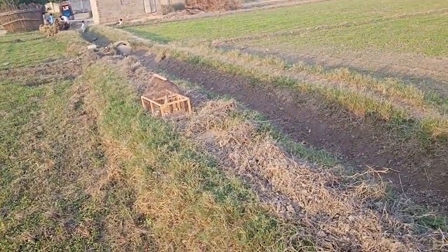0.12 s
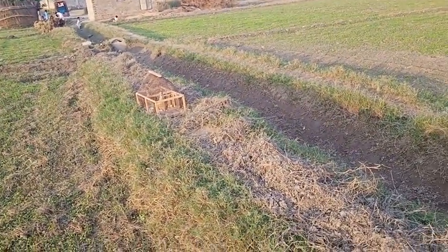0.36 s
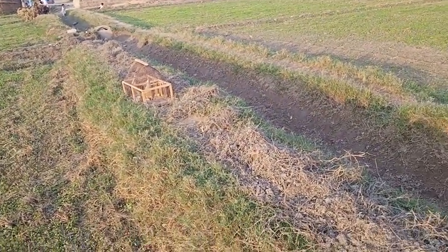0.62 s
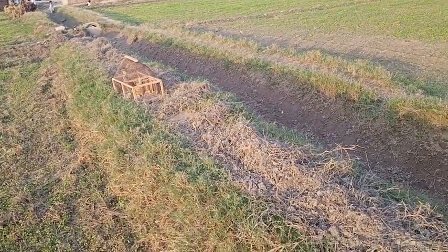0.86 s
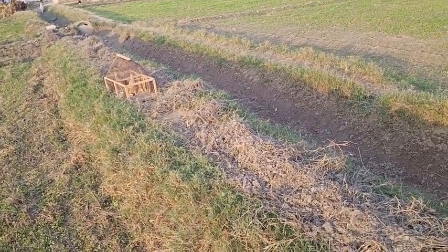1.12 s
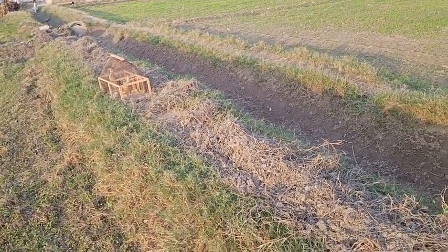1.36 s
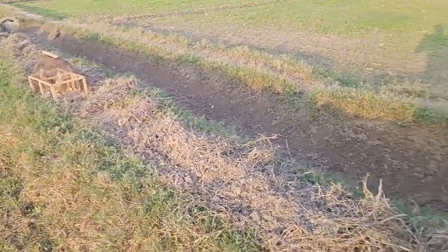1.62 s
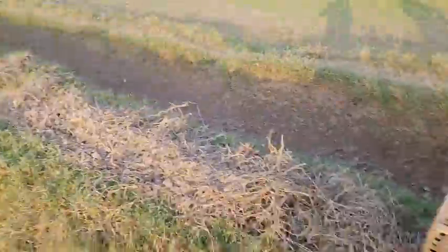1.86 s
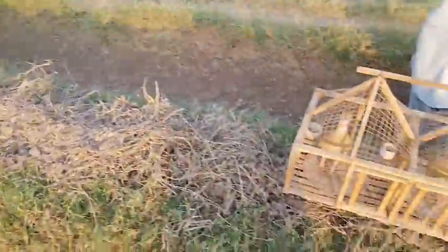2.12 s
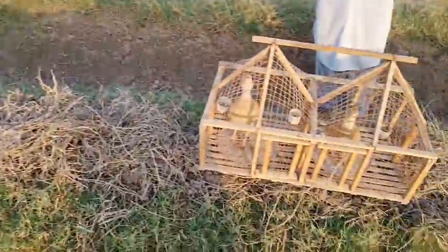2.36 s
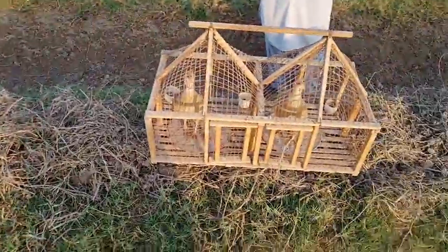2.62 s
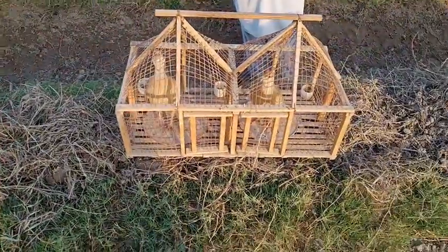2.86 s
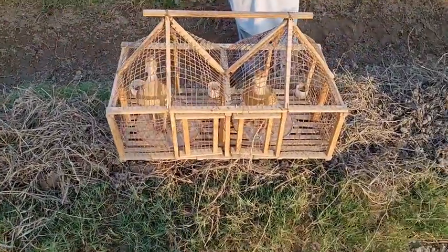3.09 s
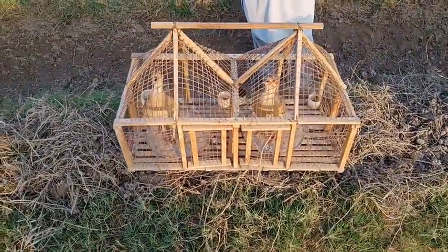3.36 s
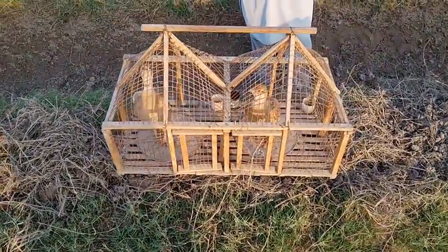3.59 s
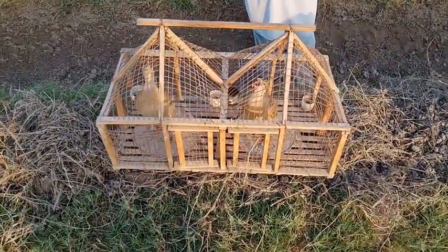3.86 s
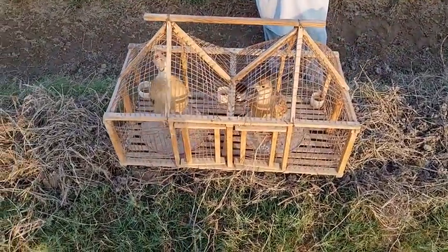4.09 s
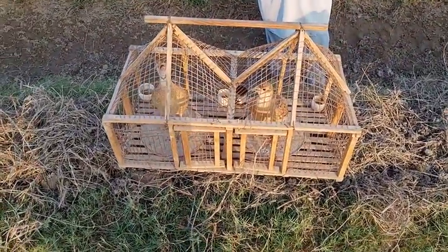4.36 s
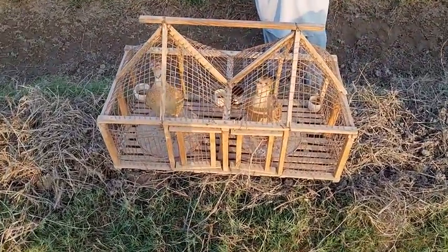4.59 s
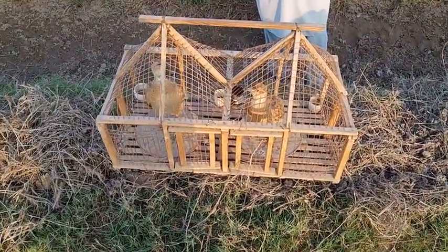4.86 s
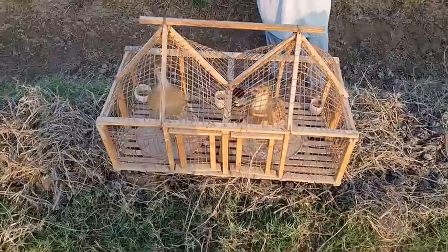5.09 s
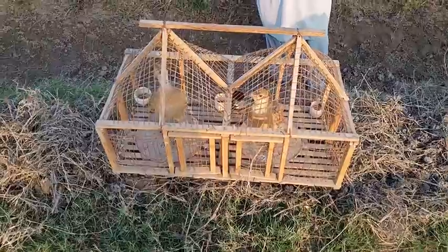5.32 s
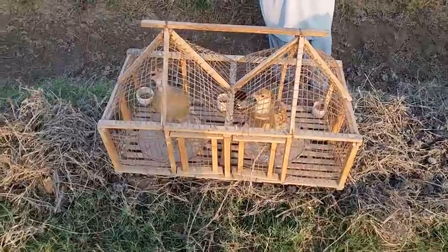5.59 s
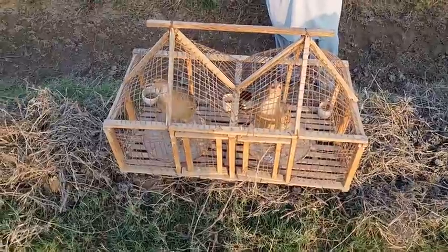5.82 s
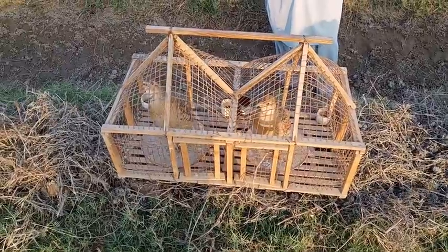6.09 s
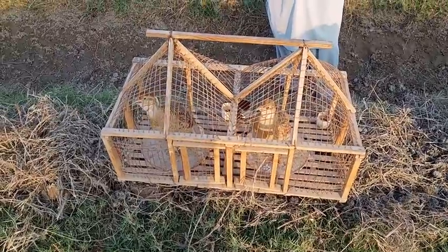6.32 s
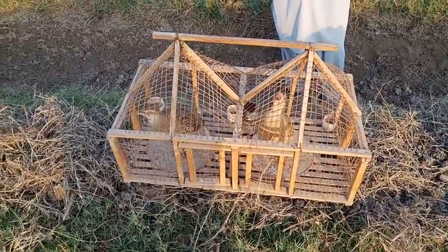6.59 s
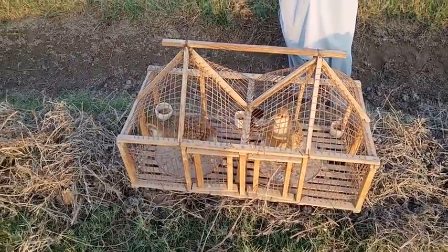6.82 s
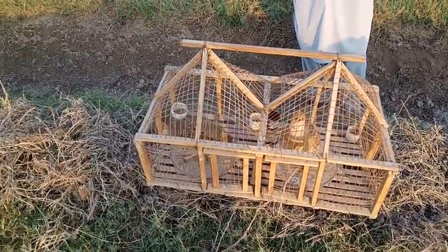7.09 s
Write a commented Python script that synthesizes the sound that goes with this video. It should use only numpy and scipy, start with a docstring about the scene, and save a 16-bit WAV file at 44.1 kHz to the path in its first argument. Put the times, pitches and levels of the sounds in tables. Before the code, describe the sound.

After a faint straw rustle and distant soft piping, a caged ground bird close to a phone microphone bursts into loud, rhythmic calling: a rasp, a piercing steady whistle, a shorter note slurring downward, then clucks, about every 0.6 seconds. Lower and higher neighbours overlap it. Open farmland adds only a low hush and weak echo. The calling stops near the end, leaving quiet air and very faint far birds.

```python
"""Open farmland, where several caged ground birds call together close to a phone.
Whistles are gliding tones with overtones; harsh rasps are irregular throat pulses ringing three cavities.
Far birds pipe faintly with the same kind of tone. Filtered noise makes a low field hush, and
grains of noise a brief rustle of straw at the start. The ground and distant walls send back a weak echo."""
import sys
import numpy as np
from scipy import signal
from scipy.fft import rfft, irfft, next_fast_len
from scipy.io import wavfile
from scipy.ndimage import map_coordinates

SR = 44100
rng = np.random.default_rng(int(sys.argv[2]) if len(sys.argv) > 2 else 0)


def convert_level_to_amplitude(level_db):
    """Map a level in decibels to its linear amplitude factor."""
    exponent = np.asarray(level_db, float) / 20
    return 10 ** exponent


def dump(signal):
    """Clip the signal to [-1, 1] and save it as 16-bit WAV at the path in sys.argv[1]."""
    limited = np.clip(np.atleast_2d(signal).T, -1, 1)
    pcm = np.round(limited * 32767).astype(np.int16)
    wavfile.write(sys.argv[1], SR, pcm)


N = 317590  # length of the scene in samples

# In the note tables, levels are set before the slow fade, flutter and chest lift; overtones before dulling.
# the near bird's long notes: (start t/s, length t/s, pitch f/Hz, level/dB, 3rd overtone level/dB)
LONG_NOTES = [(.361, .084, 2387, -11.5, -6.5), (.922, .08, 2444, -12, -5.5), (1.479, 0.086, 2447, -12, -6),
              (2.062, 0.084, 2443, -12, -13), (2.678, .087, 2450, -15.5, -8),
              (3.299, .084, 2437, -18, -5.5), (3.906, .084, 2444, -12, -10.5),
              (4.523, .092, 2434, -11, -12), (5.2, .086, 2434, -11.5, -14),
              (5.836, 0.092, 2425, -11, -10.5), (6.56, .089, 2423, -13, -6.5)]
# its short notes: (start t/s, length t/s, pitch f/Hz, level/dB, 3rd overtone level/dB)
SHORT_NOTES = [(1.063, .027, 2270, -13.5, -9), (1.677, .031, 2274, -12, -11), (2.29, 0.033, 2282, -14, -9),
               (2.869, 0.032, 2262, -11, -19), (3.476, .035, 2274, -11, -18),
               (4.091, .033, 2292, -10, -18.5), (4.782, .038, 2282, -13.5, -14.5),
               (5.402, 0.035, 2266, -15.5, -7), (6, .032, 2300, -20, -1.5)]
# its falling slurs after short notes: (start t/s, length t/s, start f/Hz, end f/Hz, level/dB)
FALLING_SLURS = [(1.117, 0.06, 2383, 1582, -15), (1.735, .064, 2330, 1576, -13),
                 (2.352, 0.059, 2380, 1528, -14), (2.931, .056, 2382, 1595, -15.5),
                 (3.538, .055, 2392, 1584, -13), (4.153, 0.055, 2343, 1581, -12),
                 (4.847, .051, 2368, 1597, -14.5), (5.469, 0.047, 2368, 1618, -13),
                 (6.065, .046, 2323, 1620, -13.5)]
# its clucks, a cough that breaks into a quick drop:
# (start t/s, length t/s, start f/Hz, level/dB, cough level/dB)
COUGHED_CLUCKS = [(1.31, 0.028, 2300, -12, -19), (1.435, .027, 2002, -17.5, -20.5),
                  (1.914, .03, 2230, -14, -20.5), (2.534, .03, 2196, -15, -21),
                  (3.112, 0.031, 2250, -18, -20.5), (3.238, .029, 2026, -16, -24),
                  (4.335, .029, 2095, -15.5, -23.5), (5.013, .029, 1978, -19, -25),
                  (5.638, 0.028, 1969, -19, -24.5), (6.236, 0.031, 1940, -22.5, -22)]


def unit(x):
    """Scales a sound to rms 1."""
    return x / np.sqrt(np.mean(x ** 2) + 1e-20)


def along(points, hz):
    """Reads (f/Hz, value) points on a log frequency axis."""
    f, v = np.transpose(points)
    return np.interp(np.log(hz + 1), np.log(f + 1), v)


def curve(rows):
    """Turns (t/s, value) rows into one value per sample."""
    return np.interp(np.arange(N) / SR, *np.transpose(rows))


def wobble(rate, size):
    """A smooth random curve with rate knots a second."""
    knots = rng.standard_normal(int(size * rate / SR) + 4)
    return map_coordinates(knots, [np.arange(size) * rate / SR])


def filtered(x, response):
    """Multiplies the spectrum of x by a complex response of frequency."""
    m = next_fast_len(N + SR // 2)
    return irfft(rfft(x, m) * response(np.fft.rfftfreq(m, 1 / SR)), m)[:N]


def resonances(modes):
    """Causal response of a few (centre f/Hz, width f/Hz, level/dB) resonances, alternating in sign."""
    def response(f):
        total = 0
        for k, (centre, width, db) in enumerate(modes):
            ring = 1j * f * width / (centre * centre - f * f + 1j * f * width)
            total = total + (-1) ** k * convert_level_to_amplitude(db) * ring
        return total
    return response


def add(track, s, sound):
    """Mixes a sound into the track from time s."""
    part = track[max(round(s * SR), 0):][:len(sound)]
    part += sound[:len(part)]


def field():
    """Low hush of air and distant land: coloured noise, gently uneven."""
    # how loud the hush is: (t/s, level/dB)
    hush_level = [(0.0, -52.5), (0.28, -56), (2.85, -62.5), (6.19, -60), (7.2, -67.5)]
    # its colour: (f/Hz, level/dB)
    hush_colour = [(18, -48.5), (40, -27), (60, -18.5), (80, -1.5), (130, -5.5), (250, -8), (500, -14.5),
                   (1200, -8.5), (2500, -16.5), (4500, -22.5), (9000, -31), (16000, -59.5)]
    hush = unit(filtered(rng.standard_normal(N), lambda hz: convert_level_to_amplitude(along(hush_colour, hz))))
    uneven_db = 1.5 * wobble(6, N) + 1.2 * wobble(25, N)
    return convert_level_to_amplitude(curve(hush_level) + uneven_db) * hush


def straw():
    """Dry stalks crackle in small grains: noise of quickly varying strength through two broad resonances."""
    # rustle at the start: (t/s, level/dB)
    rustle_level = [(0, -56), (0.03, -49), (0.07, -56), (0.17, -66), (0.3, -122), (0.34, -110), (7.3, -110)]
    grains = rng.standard_normal(N) * convert_level_to_amplitude(3 * wobble(150, N))
    stalks = resonances([(1500, 5400, 8.0), (3500, 4500, 6.6)])
    return convert_level_to_amplitude(curve(rustle_level)) * unit(filtered(grains, stalks))


def far_birds():
    """Faint far piping: soft-edged gliding tones."""
    # (start t/s, length t/s, start f/Hz, end f/Hz, level/dB)
    piping = [(.018, .015, 1002, 887, -47.5), (.04, .105, 1150, 966, -46.5), (.775, .09, 2450, 2414, -53.5),
              (6.73, 0.061, 1140, 1180, -68), (6.96, .07, 1208, 1414, -66), (6.94, .2, 1160, 1238, -67),
              (6.99, 0.13, 1770, 1874, -68), (6.99, 0.13, 2420, 2450, -66.5), (7.15, .06, 2400, 2340, -63)]
    # shape: (share of the glide left at the middle, 2nd overtone level/dB, 3rd overtone level/dB)
    piping_shape = (0.26, -15.5, -24)
    return whistles(falling(piping, piping_shape), edge_s=0.04, fade_db=2.0, waver_hz=8.5,
                    breath_db=-44.0, dull_db=10, soften=0.1)


def echo(x, decay, delay_s):
    """A noisy tail in which each frequency dies at its own speed; decay: (f/Hz, time to fall 60 dB t/s)."""
    hz, t, z = signal.stft(rng.standard_normal(SR), SR, nperseg=256)
    fading = convert_level_to_amplitude(-60 * t / along(decay, hz)[:, None])
    tail = signal.istft(z * fading, SR, nperseg=256)[1]
    delayed = np.pad(x, (round(delay_s * SR), 0))
    return signal.fftconvolve(delayed, tail / np.linalg.norm(tail))[:N]


def echoes(birds):
    """A weak late answer from the land and a short ring of cage and ground."""
    # decay of the late answer: (f/Hz, time to fall 60 dB t/s)
    land_decay = [(2400, 0.6), (5000, 0.28), (12000, 0.04)]
    answer = convert_level_to_amplitude(-44) * echo(birds, land_decay, delay_s=.03)
    return answer + convert_level_to_amplitude(-18.5) * echo(birds, [(2000, 0.082)], delay_s=0.0027)


def facing(s):
    """Brightness in dB at time s: how squarely the near bird faces the phone."""
    # (t/s, level/dB)
    turning = [(.3, -0.5), (1.1, 4), (1.7, 2.5), (2.4, 1), (3, -1.5), (3.7, -2), (4.4, -1.5), (5, -1),
               (5.7, -1.5), (6.05, 2), (6.2, -2), (6.7, 1)]
    return np.interp(s, *np.transpose(turning))


def held(table, shape, second):
    """Held notes: the pitch bends from start to end, and the 2nd overtone follows up to three other levels.

    Rows out: (start, length, start, middle and end Hz, dB, 2nd dB, 3rd dB, how early it settles)."""
    start, end, settle = shape
    rows = []
    for s, length, hz, db, third_db in table:
        second_db = np.dot(second, [1, third_db, facing(s), db])
        rows.append((s, length, hz * (1 + start / 100), hz, hz * (1 + end / 100), db,
                     second_db, third_db, settle))
    return rows


def falling(table, shape, bright=lambda s: 0):
    """Gliding notes in the same form; bright lifts both overtones."""
    left, second_db, third_db = shape
    rows = []
    for s, length, hz0, hz2, db in table:
        middle = hz2 + left * (hz0 - hz2)
        rows.append((s, length, hz0, middle, hz2, db, second_db + bright(s), third_db + bright(s), 0))
    return rows


def neighbour_notes():
    """The neighbours' held and falling notes; facing also sways the 2nd overtone of the held ones."""
    # held notes of a lower and a higher neighbour, and long notes of a neighbour:
    # (start t/s, length t/s, pitch f/Hz, level/dB, 3rd overtone level/dB)
    low = [(.509, 0.019, 2148, -18, 0.5), (.659, 0.041, 2080, -21.5, -18), (1.213, 0.038, 2108, -20.5, -14),
           (2.28, 0.037, 2114, -30, -12), (2.872, 0.036, 2127, -21, -40), (3.485, .05, 2127, -22, -21),
           (4.731, 0.044, 2132, -16.5, -20.5)]
    high = [(1.1, 0.059, 3127, -22.5, -21), (1.617, .039, 3145, -21, -23.5),
            (1.722, 0.025, 2800, -25, -15.5), (2.105, .068, 3100, -22, -36.5), (2.697, .073, 3146, -27, -8),
            (3.302, 0.037, 3100, -26, -26.5), (3.916, 0.05, 3100, -29, -20.5)]
    answers = [(.575, 0.073, 2436, -24.5, -9), (4.56, .082, 2462, -19.5, -26.5)]
    # falling notes: (start t/s, length t/s, start f/Hz, end f/Hz, level/dB)
    drops = [(.555, .053, 2108, 1528, -21), (.71, .055, 2237, 1408, -16), (1.268, .068, 2132, 1443, -22),
             (1.47, .024, 1746, 1296, -26.5), (1.584, .02, 1920, 1340, -25),
             (1.815, .02, 1716, 1510, -29.5), (1.975, .028, 2041, 1498, -22.5),
             (2.09, .025, 1820, 1450, -32), (2.34, .061, 2162, 1481, -17), (2.663, .012, 1972, 1540, -15),
             (2.94, .037, 2740, 2415, -36), (2.955, .036, 2070, 1606, -20.5),
             (3.131, 0.018, 2014, 1503, -17), (3.56, .048, 2000, 1552, -22),
             (3.755, 0.019, 2063, 1508, -23), (3.875, .01, 1743, 1493, -21.5),
             (4.16, .047, 2207, 1550, -16.5), (4.207, .051, 2267, 1543, -19),
             (4.395, .027, 1973, 1520, -27.5), (4.785, .054, 2222, 1540, -18.5),
             (4.986, 0.029, 1858, 1472, -29)]
    # held shapes: (start over pitch/%, end over pitch/%, how early it settles 0-1)
    low_shape = (1.7, -0.7, 0)
    high_shape = (1.2, -3.3, 0)
    answer_shape = (3.7, -.8, 0.27)
    # 2nd overtone: (level/dB, then the shares it follows of the 3rd overtone, facing and note level)
    low_second = (-6.5, 0.24, 1, 0)
    high_second = (-10.5, 0.5, 1.6, 0)
    answer_second = (-10, 1, -0.5, -0.5)
    # falling shape: (share of the drop left at the middle, 2nd overtone level/dB, 3rd overtone level/dB)
    drop_shape = (.48, -20.5, -26.5)
    rows = held(low, low_shape, low_second) + held(high, high_shape, high_second)
    rows += held(answers, answer_shape, answer_second)
    return rows + falling(drops, drop_shape)


def near_notes():
    """Every whistled note of the near bird, held or falling."""
    # brief clear pips inside the rasp before a long note, and mellow clucks, which only sag:
    # (start t/s, length t/s, pitch f/Hz, level/dB, 3rd overtone level/dB)
    pips = [(.88, .018, 2470, -17, 1.5), (1.44, .019, 2462, -20, 1), (2.021, .017, 2485, -19, -4),
            (3.26, .016, 2480, -23, -3), (3.869, .015, 2420, -26, -9), (4.49, .0084, 2414, -22, -2),
            (5.164, .012, 2440, -27, 2), (5.806, .008, 2440, -27, 2.5), (6.528, 0.0072, 2406, -27, 3)]
    mellow = [(3.713, 0.034, 1915, -18.5, -18.5), (3.843, .031, 1894, -18.5, -21)]
    # held shapes: (start over pitch/%, end over pitch/%, how early it settles 0-1)
    long_shape = (2.5, -.1, 0.15)
    pip_shape = (-5, -.5, 0)
    short_shape = (1.18, -0.84, 0)
    mellow_shape = (5.3, -11, 0)
    # 2nd overtone: (level/dB, then the shares it follows of the 3rd overtone, facing and note level)
    long_second = (-27.5, 0, .3, -1.34)
    pip_second = (-2, -1, 0.7, 0)
    short_second = (-13.5, 0, 2, 0)
    mellow_second = (-11, 0, 0.5, 0)
    # falling shapes: (share of the drop left at the middle, 2nd overtone level/dB, 3rd overtone level/dB)
    slur_shape = (.52, -20.5, -18)
    cluck_shape = (.42, -18.5, -20.5)
    cluck_end_hz = 1526
    clucks = [(s, length, hz, cluck_end_hz, db) for s, length, hz, db, _ in COUGHED_CLUCKS]
    rows = held(LONG_NOTES, long_shape, long_second) + held(pips, pip_shape, pip_second)
    rows += held(SHORT_NOTES, short_shape, short_second) + held(mellow, mellow_shape, mellow_second)
    return rows + falling(FALLING_SLURS, slur_shape, facing) + falling(clucks, cluck_shape, facing)


def breaks():
    """The voice breaks into a rasp at the edges of notes and at other set times.

    Rows out: (start, rise, fall, dB, chest dB, beak dB), the last two against the throat."""
    # lone rasps, lead-ins to long notes, coughs with or without a cluck after,
    # and faint low noise beside whistles:
    # (start t/s, rise t/s, fall t/s, peak level/dB, chest level/dB)
    timed_rasps = [(.307, 0.016, 0.042, -19.5, -8), (.352, .0081, 0.012, -24, -2.5),
                   (.457, .012, 0.013, -22, -2), (.478, 0.03, 0.013, -25, -4.5),
                   (.518, .015, 0.016, -21.5, -13.5), (.544, .022, 0.037, -20, 3),
                   (.606, 0.0058, 0.028, -32.5, 3.5), (.646, .014, .02, -28.5, -7.5),
                   (.716, .019, .013, -18, 11), (.832, .016, 0.048, -25.5, 19.5),
                   (.867, .015, .0059, -21, -2.5), (.888, 0.015, 0.03, -20, -3.5),
                   (1.125, 0.012, 0.049, -33, -1.5), (1.197, 0.011, 0.036, -36.5, -10),
                   (1.245, .015, 0.031, -33.5, -3), (1.45, .019, 0.024, -21.5, -2),
                   (1.587, 0.019, 0.019, -27.5, -7.5), (1.744, .011, .0053, -27.5, -6.5),
                   (1.936, 0.051, 0.0027, -35, 17.5), (2.011, 0.0085, 0.013, -27, -14),
                   (2.028, 0.016, 0.05, -20.5, -4), (2.63, 0.021, 0.047, -19, -3.5),
                   (3.246, .036, 0.028, -22, -7), (3.691, .016, .018, -28, 6),
                   (3.819, 0.02, .012, -29, 6.5), (3.854, .014, 0.0085, -22.5, -7),
                   (3.871, 0.03, 0.0088, -22.5, -8.5), (4.431, .022, 0.022, -30, 10),
                   (4.468, 0.018, 0.012, -24, -12.5), (4.494, 0.026, 0.017, -21, -3.5),
                   (4.563, .022, .021, -34, 26.5), (4.689, 0.022, 0.017, -36.5, 11),
                   (5.094, 0.039, 0.026, -29, 11.5), (5.153, 0.033, 0.02, -21, -8.5),
                   (5.73, .027, .025, -27, 11), (5.795, .008, .055, -19.5, -12),
                   (6.331, 0.025, 0.028, -25.5, 8.5), (6.453, .024, 0.025, -31.5, 14),
                   (6.515, .007, .058, -19, -9.5)]
    # rasps tied to the near bird's notes:
    # (lag from the note edge t/s, rise t/s, fall t/s, peak level/dB, chest level/dB, beak level/dB)
    after_long = (-.007, .007, .02, -25.5, -6, -.5)
    before_short = [(-.048, .018, .023, -21, -7, -7), (-.014, .014, .011, -22.5, -7, -0.5)]
    after_short = (-.009, .009, .017, -24.5, -5.5, 0)
    # its negative rise makes it start already past its peak
    before_slur = (-0.01, -0.0255, 0.0657, -24.5, -7.5, -3)
    # its peak level is added to the cough's
    before_cluck = (-.023, 0.018, 0.0072, -0.75, 1.5, 0.21)
    # the ragged end of slurs and clucks
    after_fall = (-.016, .014, .017, -36, 10, 1)
    # beak of a timed rasp: base dB, share of the chest's dB it follows, growth of that share per dB of facing
    beak_db, beak_follows, beak_turns = -0.4, 0.25, 0.16

    # each tie: (time of the note edge, dB to add, rasp)
    ties = [(s + length, 0, after_long) for s, length, *_ in LONG_NOTES]
    ties += [(s, 0, rasp) for s, *_ in SHORT_NOTES for rasp in before_short]
    ties += [(s + length, 0, after_short) for s, length, *_ in SHORT_NOTES]
    ties += [(s, 0, before_slur) for s, *_ in FALLING_SLURS]
    ties += [(s, cough_db, before_cluck) for s, *_, cough_db in COUGHED_CLUCKS]
    ties += [(s + length, 0, after_fall) for s, length, *_ in FALLING_SLURS + COUGHED_CLUCKS]
    rows = [(s + lag, rise, fall, db + added_db, chest, beak)
            for s, added_db, (lag, rise, fall, db, chest, beak) in ties]
    for s, rise, fall, db, chest in timed_rasps:
        share = beak_follows + beak_turns * facing(s)
        rows.append((s, rise, fall, db, chest, beak_db + share * max(chest, -8)))
    # facing the phone brightens the beak of every rasp
    return [(*row[:-1], row[-1] + facing(row[0])) for row in rows]


def rasps(rate_hz, arch, jump, noise, limp, flicker_db, skirt, steep):
    """The folds slap near half the whistle pitch, fastest at the peak, and three cavities ring.

    The rate jumps every few ms, overtones flicker one by one, at times every 2nd or 3rd slap is stronger."""
    # resonances that the slaps ring: (centre f/Hz, width f/Hz, level/dB)
    chest_modes = [(905, 400, -2), (1060, 1500, -23.5), (1798, 387, 18)]
    throat_modes = [(2615, 400, -1), (3700, 700, 2.5)]
    beak_modes = [(5200, 1740, 10), (6725, 1560, 15.5), (8100, 7200, -12), (12100, 4000, -31.5)]
    drive = np.zeros((3, N))
    order = np.arange(1, 14)[:, None]
    for s, rise, fall, db, chest_db, beak_db in breaks():
        lead = .012 / (1 + np.exp(-chest_db - 3))  # chesty rasps creep in early and softly
        t = np.arange(round((lead + rise + 2 * fall) * SR)) / SR - lead
        creep = .12 * np.clip((t + lead) / lead, 0, 1)
        onset = np.maximum(np.sin(np.pi / 2 * np.clip(t / rise, 0, 1)) ** steep, creep)
        swell = np.where(t < rise, onset, np.exp(-skirt * (np.abs(t - rise) / fall) ** 2.4))

        jumps = np.tanh(2 * wobble(90, len(t))) + .28 * wobble(800, len(t))
        rate = rate_hz * (1 + arch * (swell - 1) + 0.072 * rng.standard_normal()) * np.exp(jump * jumps)
        turns = np.cumsum(rate) / SR + 6 * rng.random()
        flicker = convert_level_to_amplitude(flicker_db * np.array([wobble(220, len(t)) for _ in order]))
        overtones = np.cos(2 * np.pi * (order * turns + rng.random(order.shape)))
        slaps = (flicker * overtones).sum(axis=0)
        limping = limp * np.clip(wobble(70, len(t)) + .3, 0, 1.5)
        slaps = slaps * (1 + limping * np.cos(2 * np.pi * turns / rng.integers(2, 4)))

        hiss = rng.standard_normal(len(t)) * np.exp(-3 * (turns % 1))  # air spurts once a cycle
        source = unit(np.sqrt(1 - noise) * unit(slaps) + np.sqrt(noise) * unit(hiss)) * swell
        shares = convert_level_to_amplitude([chest_db, 0, beak_db])
        for track, share in zip(drive, shares / np.linalg.norm(shares)):
            add(track, s - lead, convert_level_to_amplitude(db) * share * source)

    hz = np.linspace(1, SR / 2, 2000)
    out = 0
    for track, modes, db in zip(drive, (chest_modes, throat_modes, beak_modes), (3.2, 1.2, 1.2)):
        ring = resonances(modes)

        def colour(f):  # little below the slap rate or far above the beak
            low_cut = (1j * f / (450 + 1j * f)) ** 2
            return ring(f) * low_cut / (1 + (1j * f / 9500) ** 2 + 1.4j * f / 9500)

        out = out + convert_level_to_amplitude(db) * filtered(track, colour) / np.sqrt(np.mean(abs(colour(hz)) ** 2))
    return out


def whistles(table, edge_s, fade_db, waver_hz, breath_db, dull_db, soften):
    """A gliding tone with overtones and breath.

    Held notes snap on and off; falling ones are rougher, softer-edged and grow dull."""
    # 4th to 6th overtones against the 3rd: (overtone f/Hz, level/dB)
    upper_levels = [(7000, 7.5), (8500, -6), (9800, -12.5), (10500, -25), (12300, -19), (13600, -24.5),
                    (14700, -15.5)]
    out = np.zeros(N)
    for s, length, hz0, hz1, hz2, db, second_db, third_db, settle in table:
        drop = abs(np.log2(hz0 / hz2))  # octaves covered by the glide
        edge = min(edge_s * (1 + soften * drop), length / 2)
        snap = min(edge_s * (1 + 2.2 * drop), edge)  # the start stays crisp
        size = round((length + (edge + snap) / 2) * SR)
        u = np.arange(size) / size
        # a falling note lingers at its top and bottom
        v = u ** np.clip(1 - settle, .2, 1) - 0.13 * drop * np.sin(2 * np.pi * u)
        # a smooth bend through the start, middle and end pitch
        pitch = hz0 * (1 - v) * (1 - 2 * v) + 4 * hz1 * v * (1 - v) + hz2 * v * (2 * v - 1)
        dull = convert_level_to_amplitude(dull_db * np.log2(pitch / hz1))  # overtones sink as the folds slacken
        pitch = pitch + waver_hz * (1 + 9 * drop) * wobble(147.4, size)
        phase = 2 * np.pi * (np.cumsum(pitch) / SR + rng.random())

        over = convert_level_to_amplitude(second_db) * np.cos(2 * phase) + convert_level_to_amplitude(third_db) * np.sin(3 * phase)
        for k in range(4, 7):
            upper_db = third_db - 13 * drop + along(upper_levels, k * pitch)
            over += convert_level_to_amplitude(upper_db) * (k * pitch < 16500) * np.cos(k * phase + k)
        breath = convert_level_to_amplitude(breath_db) * np.diff(rng.standard_normal(size + 1)) * (1 + np.sin(phase))

        gate = np.clip(np.minimum(u / snap, (1 - u) / edge) * size / SR, 0, 1)
        level = convert_level_to_amplitude(db + fade_db * (.5 - u) + .4 * wobble(60, size) + 4.5 * drop * wobble(260, size))
        chest_lift_db = 3.6 * np.exp(-((pitch - 1800) / 250) ** 2)  # the chest lifts the tone as it passes
        level = level * convert_level_to_amplitude(chest_lift_db - (5 + 10 * u ** 2) * drop)
        tone = np.sqrt(2) * (np.sin(phase) + dull * over)
        add(out, s - snap / 2, level * np.sin(np.pi / 2 * gate) ** 2 * (tone + breath))
    return out


def caged_birds():
    """Whistles of the near bird and its neighbours, with the rasps."""
    tones = whistles(near_notes() + neighbour_notes(), edge_s=.003, fade_db=1.5, waver_hz=2.5,
                     breath_db=-41.0, dull_db=48, soften=4.1)
    return tones + rasps(rate_hz=1230, arch=.24, jump=.07, noise=.14, limp=.9, flicker_db=4,
                         skirt=2.2, steep=.85)


def scene():
    """Caged birds, their echo, far birds, the field and the straw."""
    birds = caged_birds()
    return (birds + echoes(birds) + far_birds() + field() + straw())[None]


def top_cut(x):
    """Nothing passes above the cut-off."""
    return signal.sosfilt(signal.butter(12, 16650, fs=SR, output="sos"), x)


def record(dry):
    """The microphone bends loud waves unevenly, leaving faint low thumps; peaks are rounded off."""
    bent = dry[0] + convert_level_to_amplitude(-39) * dry[0] ** 2
    rounded = bent / (1 + np.abs(bent / .68) ** 6) ** (1 / 6)
    mix = filtered(rounded, lambda hz: (1j * hz / (32 + 1j * hz)) ** 2)  # cuts the deepest bass
    return top_cut(mix[None])


dry = scene()
out = record(dry)
dump(out)
```